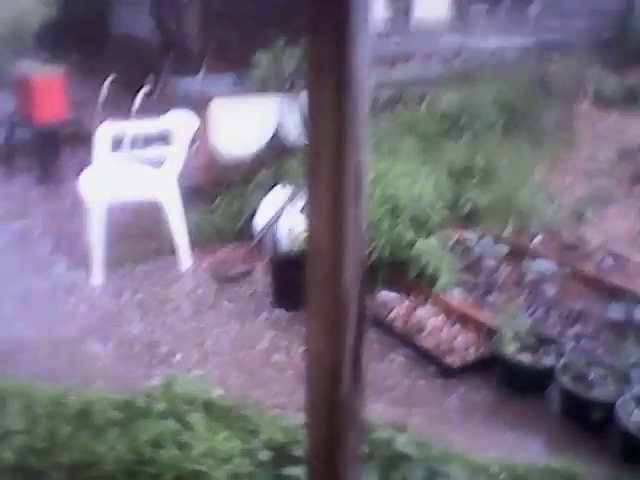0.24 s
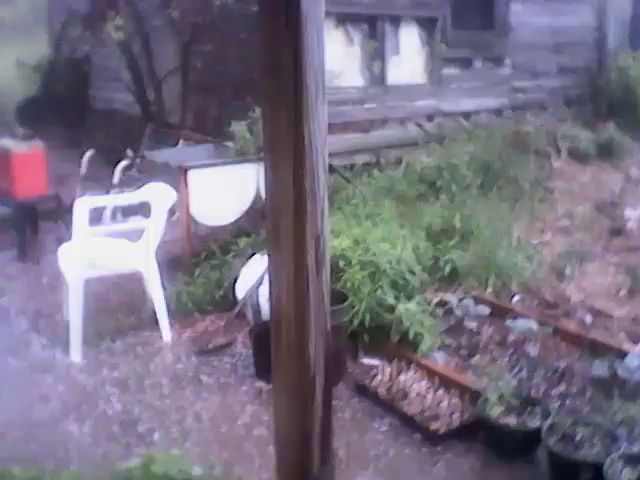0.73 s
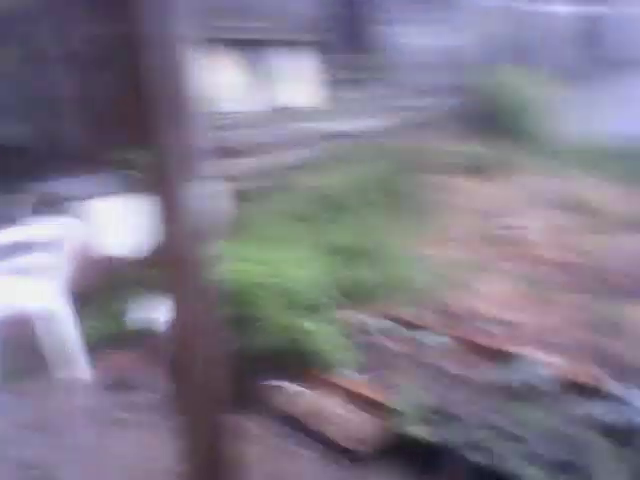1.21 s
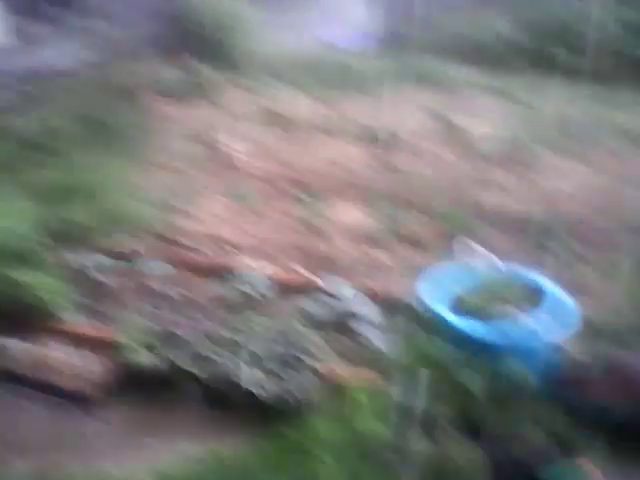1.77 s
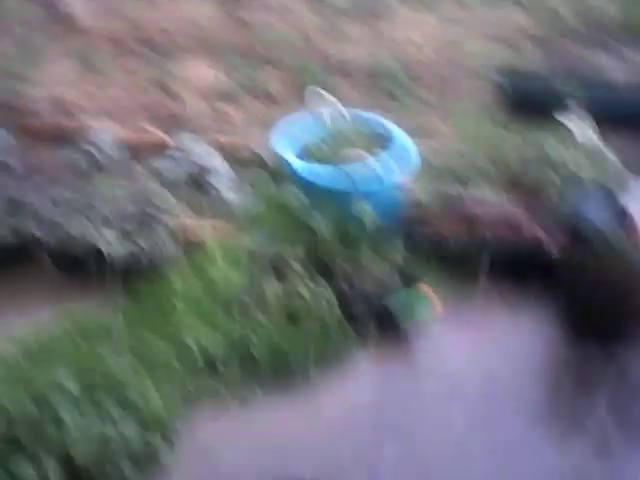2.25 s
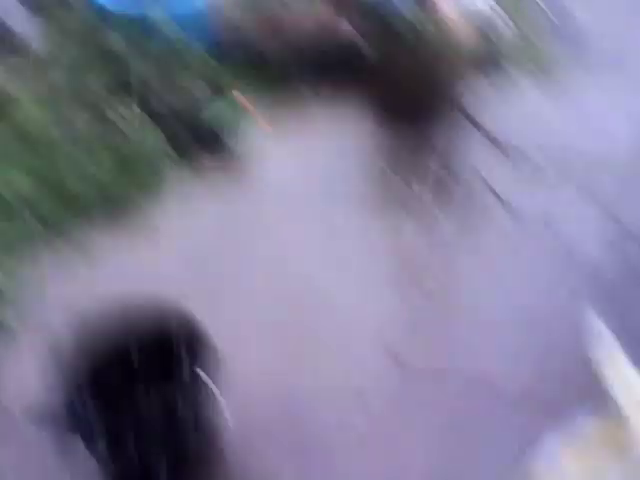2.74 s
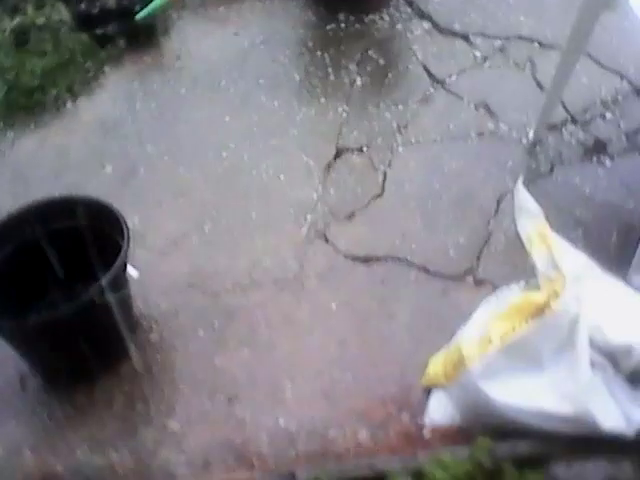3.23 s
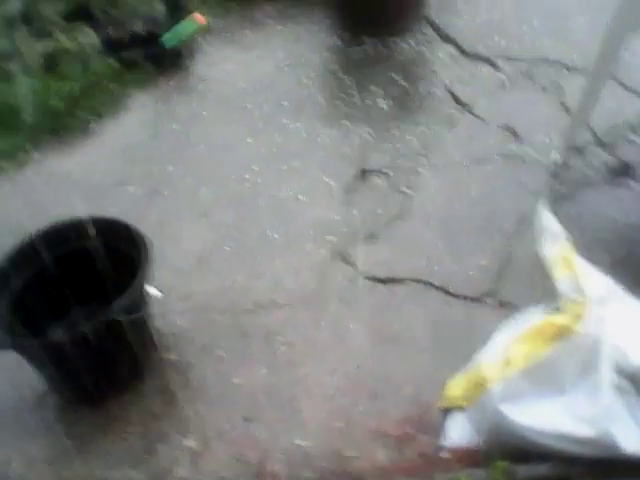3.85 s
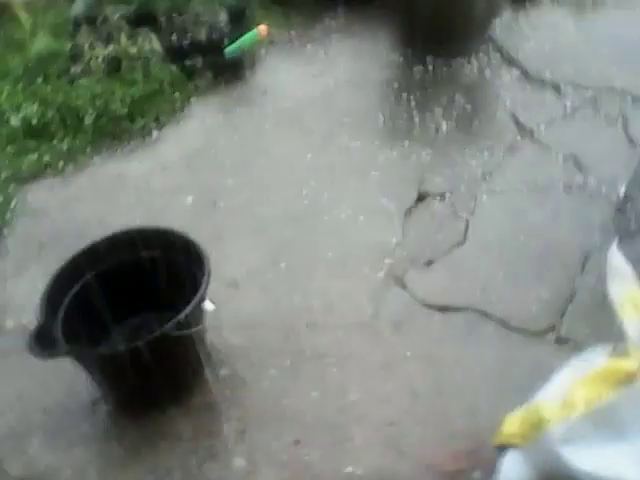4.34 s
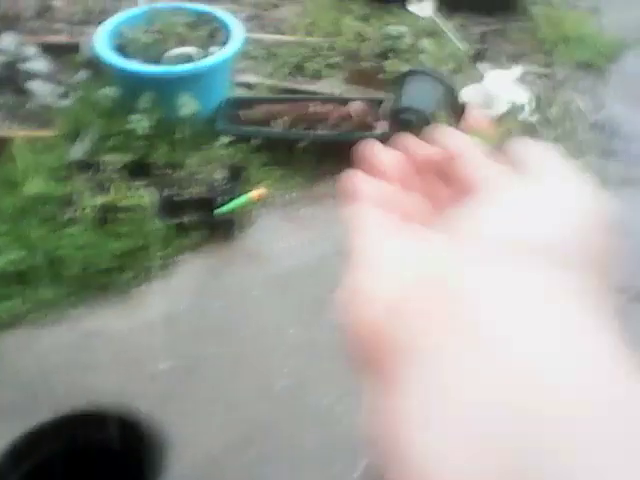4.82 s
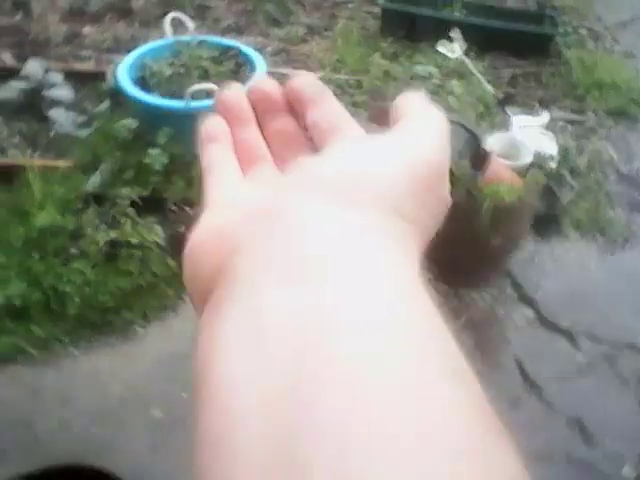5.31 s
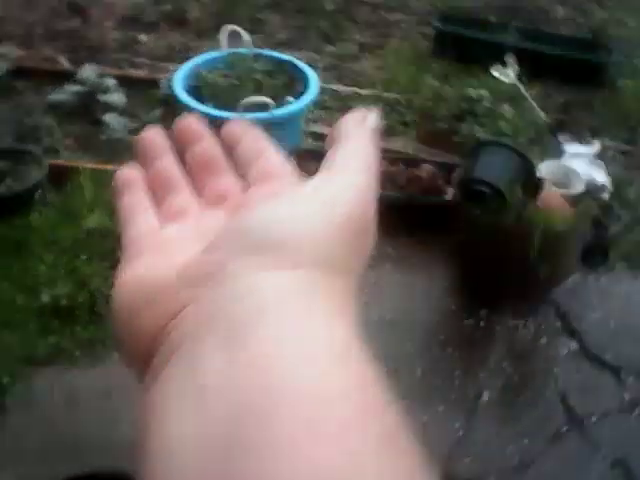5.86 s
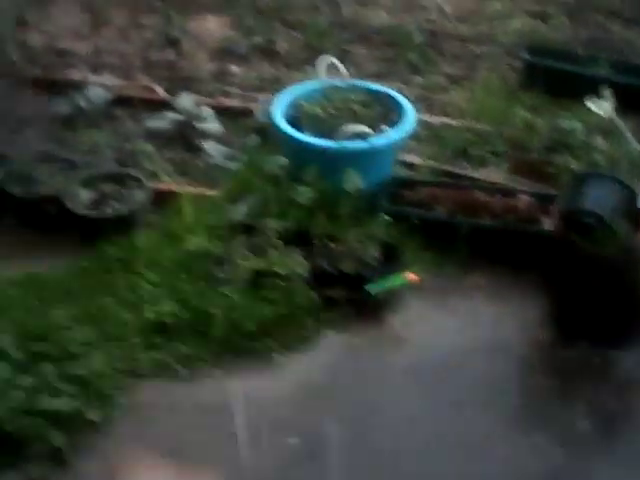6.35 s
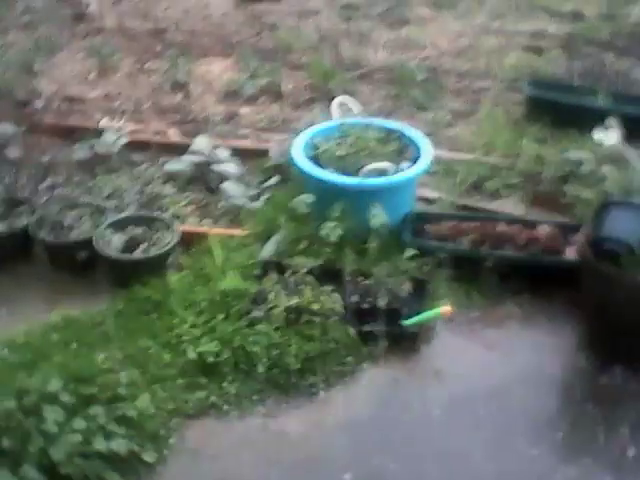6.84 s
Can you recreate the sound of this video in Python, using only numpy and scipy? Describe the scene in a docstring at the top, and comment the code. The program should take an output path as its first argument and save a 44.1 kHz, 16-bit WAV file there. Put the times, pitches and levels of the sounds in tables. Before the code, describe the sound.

Under a porch in a small backyard, rain makes a continuous grainy wash while hailstones tick sharply on concrete and more roundly on pots. Hollow plastic knocks cluster in the first second. Heavy drops splash in brief bursts throughout. In the last two seconds the hand-held microphone rumbles and crackles unevenly as the grip shifts, with stronger dull knocks, before rain and hail continue.

```python
"""Hail and rain from under a porch

Hail and rain fall on a back yard: countless small drops, as filtered random clicks and noise, form a wash.
Hailstones tick on concrete and pots as short decaying modes; heavy drops splash as bursts of grainy spray.
Hollow plastic knocks in a few low cycles with an overtone and a loose rattle.
Late on, as an arm reaches out into the hail and back, the hand-held microphone rumbles and crackles
with uneven friction; soft low bumps of the fingers occur throughout."""
import sys
import numpy as np
from scipy import signal
from scipy.fft import rfft, irfft, next_fast_len
from scipy.io import wavfile
from scipy.ndimage import map_coordinates

SR = 44100
rng = np.random.default_rng(int(sys.argv[2]) if len(sys.argv) > 2 else 0)


def to_wav(s):
    """Save 16-bit WAV."""
    ch = np.atleast_2d(s).T  # columns
    pcm = np.round(np.clip(ch, -1, 1) * 32767)  # PCM
    wavfile.write(sys.argv[1], SR, pcm.astype(np.int16))


N = 312484


def from_db(db):
    """Decibel law: 20 dB is a factor of ten in amplitude."""
    return 10 ** (np.asarray(db) / 20)


def rms_one(x):
    """Power normalization: the root mean square becomes 1."""
    return x / np.sqrt(np.mean(x ** 2) + 1e-20)


def in_time(rows):
    """Linear interpolation: each column of a curve, sample by sample."""
    s, *columns = np.transpose(rows)
    return [np.interp(np.arange(N) / SR, s, column) for column in columns]


def add(out, s, sound):
    """Superposition: mix a sound in at a time in seconds."""
    i = int(np.clip(s * SR, 0, N))
    out[i:i + len(sound)] += sound[:N - i]


def band(x, low_hz, high_hz):
    """Band-pass filtering: only the range between two frequencies passes freely."""
    edges = [low_hz, min(high_hz, .45 * SR)]
    sos = signal.butter(2, edges, "band", fs=SR, output="sos")
    return signal.sosfilt(sos, x + 1e-18)


def colour(x, spectrum):
    """Minimum-phase filtering: a causal response follows a spectrum; rms 1."""
    hz, db = np.transpose(spectrum)
    size = next_fast_len(N + SR // 4, real=True)
    size += size % 2
    grid = np.maximum(np.arange(size // 2 + 1) * SR / size, 1)
    gain = from_db(np.interp(np.log(grid), np.log(hz), db))
    # folding the cepstrum onto positive time makes the filter causal
    cepstrum = irfft(np.log(gain))
    cepstrum[1:size // 2] *= 2
    cepstrum[size // 2 + 1:] = 0
    response = np.exp(rfft(cepstrum))
    return rms_one(irfft(rfft(x, size) * response)[:N])


def drift(rate):
    """Slow random modulation: chance values joined by lines, at a rate per second; rms 1."""
    knots = rng.standard_normal(int(N / SR * 200) + 2)
    position = np.arange(N) / SR * min(rate, 200)
    return rms_one(np.interp(position, np.arange(len(knots)), knots))


def swell(t, rise):
    """Critically damped response: a quick rise to 1 and an exponential fall."""
    return t / rise * np.exp(1 - t / rise)


def impacts(per_s, spread_db):
    """Random point process: clicks at chance times, many small and a few large."""
    count = int(per_s * N / SR)
    chance, clicks = rng.random((count, 3)), np.zeros(N)
    sizes = from_db(spread_db * np.minimum(-np.log1p(-chance[:, 0]), 3.5))
    clicks[(chance[:, 1] * N).astype(int)] = sizes * np.sign(chance[:, 2] - .5)
    return clicks


def drops(per_s, spread_db, low_hz, high_hz, cycles, count=24):
    """Resonance: clicks excite many small pitches, each ringing for a few cycles."""
    half_width = (1 + 1 / cycles) ** .5
    pitches = np.geomspace(low_hz, high_hz, count)
    return rms_one(sum(band(impacts(per_s / count, spread_db), hz / half_width, hz * half_width)
                       for hz in pitches))


def yard(x, wet_db, t60):
    """Diffuse reverberation: walls, porch roof and clutter scatter sound into a short tail."""
    t = np.arange(SR // 2) / SR
    echo = band(rng.standard_normal(len(t)), 220, 10200) * from_db(-60 * t / t60) * (t > .003)
    return x + from_db(wet_db) * signal.fftconvolve(x, echo / np.linalg.norm(echo))[:N]


def flicker(x, depth_db, rate, count=30):
    """Independent band modulation: each narrow band swells as drops happen to hit things ringing there."""
    hz, s, spectra = signal.stft(x, SR, nperseg=512)
    # bands are even at low frequency and widen towards the treble
    pitch = np.log1p(hz / 1200) / np.log1p(14000 / 1200) * count
    chance = rng.standard_normal((count * 2, 1500))
    places = np.meshgrid(pitch, s * rate, indexing="ij")
    gains = map_coordinates(chance, places, order=1, mode="mirror")
    gains_db = depth_db * np.minimum(rms_one(gains), 2)
    return rms_one(signal.istft(spectra * from_db(gains_db), SR, nperseg=512)[1][:N])


def flurries(per_s, decay):
    """Shot-noise envelope: overlapping puffs of uneven size; rms 1."""
    t = np.arange(SR // 4) / SR
    puffs = signal.fftconvolve(np.abs(impacts(per_s, 3)), swell(t, decay))[:N]
    return rms_one(puffs)


# strength of the shower: time_s [s], wash_db, patter_db [dB, relative]
SHOWER_STRENGTH = [(0.0, -43.5, -50.5), (1.2, -44, -56), (1.55, -45, -47.5), (1.9, -44, -53),
                   (3.3, -42.5, -58), (3.85, -38, -52), (4.4, -44.5, -53), (5.3, -37.5, -47.5),
                   (5.8, -43, -50), (6.5, -38, -48.5), (6.8, -44, -48), (7.09, -40, -34)]


def shower_levels():
    """Source strength: the far wash and near patter rise and fall separately."""
    return in_time(SHOWER_STRENGTH)


# spectrum of the far rain: frequency_hz [Hz], level_db [dB, relative]
WASH_SPECTRUM = [(18, -39), (30, -8), (49, 8), (470, 4.5), (728, 8), (827, 7.5), (1100, 8.5), (1380, 3),
                 (4070, -6.5), (6810, -8.5), (9040, -12.5), (14000, -11)]


def rain_wash():
    """Incoherent summation: far drops merge into flickering noise with reverberant pats."""
    pats = drops(per_s=600, spread_db=3.6, low_hz=430, high_hz=3500, cycles=7, count=36)
    pats = yard(pats, wet_db=-5, t60=.07)
    far = flicker(rng.standard_normal(N), depth_db=4.2, rate=42, count=40)
    far = far * from_db(2.2 * drift(rate=25))
    bed = far + from_db(-5.5) * pats * from_db(2.5 * drift(rate=12))
    wash_db, _ = shower_levels()
    return colour(bed, WASH_SPECTRUM) * from_db(wash_db - 13.0)


# spectrum of the near rain: frequency_hz [Hz], level_db [dB, relative]
PATTER_SPECTRUM = [(1500, -35), (2500, -16), (3700, -10), (5500, -11.5), (7500, -12.5), (10000, -9.5),
                   (12000, -27), (14000, -20.5)]


def rain_patter():
    """Granular excitation: nearer drops tick and burst into small puffs of spray."""
    ticks = drops(per_s=190, spread_db=3.8, low_hz=2200, high_hz=6000, cycles=9)
    grains = flicker(impacts(per_s=5000, spread_db=3.5), depth_db=5.8, rate=35, count=56)
    spray = grains * (.1 + flurries(per_s=32, decay=.005))
    near = spray + from_db(-5.5) * yard(ticks, wet_db=-3, t60=.06)
    _, patter_db = shower_levels()
    return colour(near, PATTER_SPECTRUM) * from_db(patter_db - 13.5)


RUB_ATTACK_S, RUB_SAG_DB_PER_S, RUB_RELEASE_S = 0.013, 16, 0.069
# the hand shifts its grip and rubs the housing; the attack is complete at start_s:
# start_s [s], length_s [s], rumble_db, crackle_db [dB]
HAND_RUBS = [(3.67, 0.083, -44, -47.5), (3.757, 0.17, -48, -54), (4.508, 0.013, -56, -50),
             (4.685, 0.069, -52, -53.5), (5.088, 0.014, -41, -67), (5.349, 0.3, -48, -52),
             (5.543, 0.11, -35.5, -47), (5.697, 0.1, -39, -44.5), (5.848, 0.056, -38.5, -51),
             (5.945, 0.062, -39, -48.5), (6.067, 0.11, -34.5, -54), (6.197, 0.037, -30.5, -60),
             (6.255, 0.13, -30.5, -59), (6.431, 0.061, -29, -45.5), (6.555, 0.12, -33, -61),
             (6.846, 0.14, -45.5, -57.5)]


def rub_level(column, resting):
    """Friction envelope: each rub starts quickly, eases off while it lasts and dies away."""
    t, level = np.arange(N) / SR, resting
    for row in HAND_RUBS:
        s, length = row[:2]
        attack = np.clip(1 + (t - s) / RUB_ATTACK_S, 0, 1)
        sag = from_db(-RUB_SAG_DB_PER_S * np.maximum(t - s, 0))
        release = np.exp(-np.maximum(t - s - length, 0) / RUB_RELEASE_S)
        level = np.maximum(level, from_db(row[column]) * attack * sag * release)
    return level


HOLDING_DB = -69.5  # rumble of the hand at rest
# the skin sticks and lets go in small jerks, over a steady share of smooth friction
GRIPS_PER_S, GRIP_S, SMOOTH_SHARE = 110, 0.0029, 1
# spectrum of the rumble: frequency_hz [Hz], level_db [dB, relative]
RUMBLE_SPECTRUM = [(20, -17), (60, -3), (110, -5.5), (200, -1), (400, -3), (550, -10.5), (950, -16),
                   (1500, -50), (5000, -53)]


def hand_rumble():
    """Stick-slip friction: uneven slips set the housing rumbling with short low rings."""
    rings = drops(per_s=520, spread_db=2.7, low_hz=160, high_hz=2600, cycles=9, count=34)
    friction = rng.standard_normal(N) * (SMOOTH_SHARE + flurries(GRIPS_PER_S, GRIP_S))
    rumble = colour(rms_one(friction) + 0.56 * rings, RUMBLE_SPECTRUM)
    return rumble * rub_level(column=2, resting=from_db(HOLDING_DB))


CRACK_DB, SKITTER_DB, REBOUND_DB = -24, -13, -26  # relative to a stone's ring
SKITTER_S, SKITTER_UNEVEN_DB = 0.0033, 7.5  # chips and spray that a stone throws off
RING_SPLIT, SPLIT_DB = .3, -11  # two side modes: nominal octaves from the main one, level


def stone(db, hz, decay_ms):
    """Modal impact: a crack excites three modes; the stone rebounds nearby and skitters off in spurts."""
    t = np.arange(SR // 16) / SR
    noise, lags = rng.standard_normal((2, len(t))), rng.uniform(.003, .016, 2)
    spurts = np.interp(t, np.linspace(0, t[-1], 32), rng.uniform(-1.7, 1.3, 32))
    sides = hz * 2 ** (RING_SPLIT * rng.uniform(.4, 1.4, 2) * [-1, 1])
    side_modes = np.sin(2 * np.pi * np.outer(sides, t)).sum(axis=0)
    modes = np.sin(2 * np.pi * hz * t) + from_db(SPLIT_DB) * side_modes
    ring = swell(t, max(decay_ms, .5) / 1000) * modes
    crack = from_db(CRACK_DB) * rms_one(band(noise[0], hz * 0.13, hz * 7.3)) * swell(t, 0.0009)
    chips = rms_one(band(noise[1], hz * 0.76, hz * 1.33)) * swell(t, SKITTER_S)
    skitter = from_db(SKITTER_DB + SKITTER_UNEVEN_DB * spurts) * chips
    rebounds = from_db(REBOUND_DB) * sum(np.interp(t - lag, t, ring) for lag in lags)
    return from_db(db) * (ring + crack + skitter + rebounds)


# most stones tick on concrete, a share ring lower on pots
CONCRETE_HZ, POT_HZ, POT_SHARE, PITCH_SPREAD_OCTAVES = 3650, 1060, 0.17, 0.258
STONES_PER_S, STONE_DB, STONE_SPREAD_DB, STONE_LIMIT_DB, STONE_RING_MS = 12, -50, 0.5, 3, 1.0


def scattered_hail():
    """Stratified random arrivals: smaller stones land all over, harder when the shower is strong."""
    wash_db, _ = shower_levels()
    out, count = np.zeros(N), int(STONES_PER_S * N / SR)
    for k in range(count):
        (when, surface), (size, pitch) = rng.random(2), rng.standard_normal(2)
        i = int((k + when) / count * N)  # one stone in each equal slot of time
        surface_hz = POT_HZ if surface < POT_SHARE else CONCRETE_HZ
        hz = surface_hz * 2 ** (PITCH_SPREAD_OCTAVES * pitch)
        size_db = min(STONE_SPREAD_DB * size, STONE_LIMIT_DB)
        shower_db = wash_db[i] - wash_db.mean()
        add(out, i / SR, stone(STONE_DB + size_db + shower_db, hz, STONE_RING_MS))
    return out


# spectrum of the spray: frequency_hz [Hz], level_db [dB, relative]
SPRAY_SPECTRUM = [(200, 6), (600, 12), (2000, 6.5), (3800, 11), (7000, 1), (10000, 3), (13000, -4)]
# heavy drops, each burst beginning 2 ms before landing_s:
# landing_s [s], level_db [dB, relative], decay_s [s]
HEAVY_DROPS = [(0.119, -46.5, 0.014), (0.486, -35.5, 0.0069), (0.801, -48.5, 0.029), (1.041, -49.5, 0.073),
               (1.347, -46, 0.061), (1.615, -43.5, 0.057), (1.727, -24, 0.0042), (2.326, -49, 0.1),
               (2.767, -44, 0.022), (3.1615, -32.5, 0.0098), (3.336, -47.5, 0.056), (3.388, -44, 0.037),
               (3.527, -39, 0.0099), (3.994, -28.5, 0.005), (4.092, -38.5, 0.0051), (5.17, -54, 0.0081),
               (5.3647, -38.5, 0.013), (5.62, -33.5, 0.0078), (6.469, -33, 0.031), (6.6443, -36.5, 0.026),
               (6.92, -36, 0.01)]


def splashes():
    """Decaying granular burst: a heavy drop breaks into spray that thins out quickly, its colour varying."""
    droplets = flicker(impacts(per_s=1700, spread_db=4), depth_db=5.7, rate=32, count=56)
    level, t = np.zeros(N), np.arange(SR // 4) / SR
    bursting = 1 - np.exp(-t / .003)
    for s, db, decay in HEAVY_DROPS:
        add(level, s - .002, from_db(db - 0.5) * bursting * np.exp(-t / decay))
    return colour(droplets, SPRAY_SPECTRUM) * level


# soft contacts ring on, hard ones crack: decay time on concrete at RING_AT_DB,
# doubled for each RING_DOUBLES_DB less
RING_MS, RING_AT_DB, RING_DOUBLES_DB = 0.9, -33.5, 8
# nominal first hop; each next one is shorter and weaker
HOP_S, HOP_SHRINK, HOP_LOSS_DB = 0.03, 0.65, 14.5
# the nearest hailstones: start_s [s], level_db [dB, of the ring], pitch_hz [Hz]
NEAR_STONES = [(0.1387, -34, 1133), (0.267, -44, 1016), (0.3135, -41.5, 1560), (0.3426, -24, 960),
               (0.3579, -25, 1190), (0.4737, -28.5, 920), (0.715, -42, 2200), (2.751, -37, 1290),
               (0.791, -40, 780), (0.8747, -40, 3370), (1.109, -38.5, 3360), (1.358, -31, 3970),
               (1.3874, -43.5, 5420), (1.426, -38.5, 843), (1.5193, -45.5, 4810), (1.568, -36.5, 2680),
               (1.6148, -44, 4300), (1.627, -41, 3870), (1.654, -43, 9250), (1.728, -34, 2770),
               (2.3548, -34, 4040), (2.4065, -30.5, 3420), (2.7216, -30.5, 1150), (2.738, -29.5, 870),
               (2.785, -31, 1640), (3.444, -33.5, 3770), (3.468, -35, 1980), (3.508, -41, 2050),
               (3.5335, -45.5, 3930), (3.561, -42, 4010), (3.701, -35.5, 1010), (3.915, -41.5, 3950),
               (3.949, -40, 4060), (3.973, -23.5, 3600), (3.9958, -23, 4520), (4.081, -39.5, 3720),
               (4.0378, -35, 3490), (4.137, -38, 2990), (4.1446, -37.5, 2520), (4.1973, -29, 980),
               (4.208, -37.5, 3290), (4.4078, -40.5, 3460), (4.5398, -34, 4630), (4.575, -44, 1686),
               (4.7287, -35.5, 873), (4.8871, -35, 1660), (4.901, -29.5, 3600), (4.9356, -45, 4020),
               (4.9943, -39, 3160), (5.0214, -36.5, 3600), (5.1254, -27, 1260), (5.173, -42, 5740),
               (5.398, -36.5, 1245), (5.6202, -31.5, 5190), (5.91, -45, 3615), (5.955, -34, 910),
               (6.242, -40, 4000), (6.351, -39, 3040), (6.439, -34, 3390), (6.5605, -40, 3050),
               (6.693, -34, 2940), (6.9058, -35.5, 810), (6.9221, -39, 2280)]


def hail():
    """Inelastic bouncing: near stones hop twice, weaker and at a new pitch at each landing."""
    out = np.zeros(N)
    for s, db, hz in NEAR_STONES:
        softness = 2 ** ((RING_AT_DB - db) / RING_DOUBLES_DB)
        decay_ms = RING_MS * softness * np.sqrt(CONCRETE_HZ / hz)  # pots ring longer than concrete
        add(out, s, stone(db, hz, decay_ms))
        for k, (height, spot) in enumerate(rng.uniform(-1.7, 1, (2, 2))):
            s = s + HOP_S * HOP_SHRINK ** k * (1 + .5 * height)
            hop_hz = hz * 2 ** (PITCH_SPREAD_OCTAVES * spot)
            add(out, s, stone(db - HOP_LOSS_DB * (k + 1), hop_hz, decay_ms))
    return out


KNOCK_CYCLES = 1.84  # nominal cycles that a knock takes to swell
# overtone and loose rattle, relative to the knock
KNOCK_SPOT_DB, RATTLE_DB, RATTLE_S, RATTLE_UNEVEN_DB = -27.5, -23.5, 0.0083, 5.5
# dull knocks on hollow plastic: peak_s [s], level_db [dB, relative], pitch_hz [Hz]
PLASTIC_KNOCKS = [(0.286, -38, 292), (0.312, -37.5, 305), (0.433, -32.5, 300), (0.467, -32, 350),
                  (0.656, -31, 290), (0.702, -34, 320), (0.779, -31.5, 307), (0.815, -32.5, 345),
                  (0.835, -35, 610), (3.683, -27, 291), (5.095, -38, 292), (5.384, -34.5, 260),
                  (5.612, -26.5, 238), (5.857, -29, 340), (6.263, -30.5, 266), (6.447, -19.5, 256),
                  (6.507, -21.5, 213), (6.897, -28.5, 187), (6.948, -27, 230)]


def knocks():
    """Damped wall vibration: low cycles swell and fade, with an overtone set by the spot and a rattle."""
    out, t = np.zeros(N), np.arange(SR // 8) / SR
    for s, db, hz in PLASTIC_KNOCKS:
        rise = rng.uniform(.75, 1.25) * KNOCK_CYCLES / hz
        ratio = rng.uniform(1.7, 3.6)
        overtone = from_db(KNOCK_SPOT_DB) * np.sin(2 * np.pi * hz * ratio * t)
        wall = swell(t, rise) ** 4 * (np.sin(2 * np.pi * hz * t) + overtone)
        unevenness = np.interp(t, t[::150], rng.uniform(-1.7, 1.3, len(t[::150])))
        chatter = from_db(RATTLE_UNEVEN_DB * unevenness)
        rattle = rms_one(band(rng.standard_normal(len(t)), 330, 1750)) * chatter * swell(t, RATTLE_S)
        add(out, s - rise, from_db(db) * wall)
        add(out, s, from_db(db + RATTLE_DB) * rattle)
    return out


# soft touches on the microphone housing: start_s [s], level_db [dB, relative]
FINGER_BUMPS = [(0.39, -47), (1.62, -49), (2.607, -41.5), (2.709, -54.5), (3.508, -50.5), (3.672, -37.5),
                (4.147, -47), (4.65, -47), (5.569, -35), (6.195, -39.5)]


def bumps():
    """Structure-borne impact: fingers bump the housing as brief swells of low noise."""
    push, t = np.zeros(N), np.arange(SR // 4) / SR
    for s, db in FINGER_BUMPS:
        add(push, s, from_db(db) * swell(t, 0.01))
    return push * rms_one(band(rng.standard_normal(N), 21, 227))


CRACKLES_PER_S, CRACKLE_UNEVEN_DB = 420, 4.5  # small slips of the skin
# spectrum of the crackle: frequency_hz [Hz], level_db [dB, relative]
CRACKLE_SPECTRUM = [(300, -32), (550, 3), (900, -4), (1300, -6.5), (1900, -11.5), (2500, -28.5), (4000, -4),
                    (7000, -40)]


def hand_crackle():
    """Micro-slip excitation: small slips of the skin make a grainy, uneven crackle during rubs."""
    slips = drops(per_s=CRACKLES_PER_S, spread_db=2.6, low_hz=550, high_hz=3200, cycles=9, count=24)
    uneven = from_db(CRACKLE_UNEVEN_DB * drift(rate=30))
    crackle = colour(yard(slips, wet_db=-2.5, t60=0.053) * uneven, CRACKLE_SPECTRUM)
    return crackle * rub_level(column=3, resting=0)


def scene():
    """Linear superposition: impacts reverberate in the yard and join the rain and handling."""
    rain = rain_wash() + rain_patter()
    hard_hits = yard(scattered_hail() + splashes() + hail(), wet_db=-10.0, t60=0.17)
    plastic_hits = yard(knocks(), wet_db=-14.5, t60=0.19)
    handling = hand_rumble() + bumps() + hand_crackle()
    return (rain + hard_hits + plastic_hits + handling)[None]


CUTOFF_HZ = 14050


def record(dry):
    """Low-pass filtering: an elliptic filter cuts the top steeply."""
    return signal.sosfilt(signal.ellip(10, .2, 70, CUTOFF_HZ, fs=SR, output="sos"), dry)


dry = scene()
out = record(dry)
to_wav(out)
```